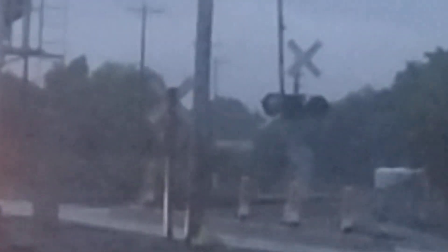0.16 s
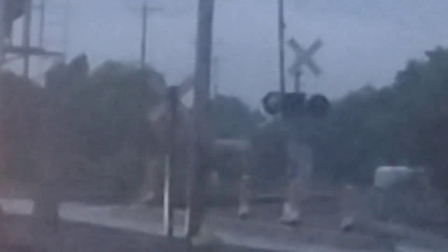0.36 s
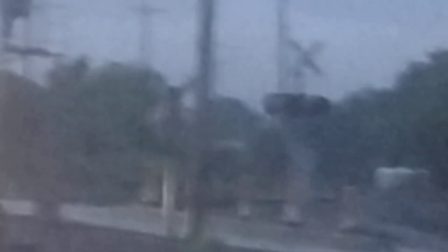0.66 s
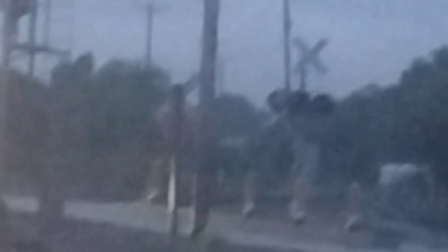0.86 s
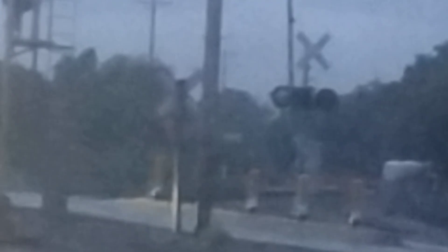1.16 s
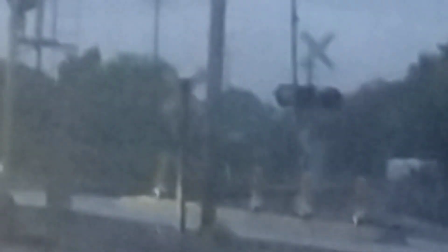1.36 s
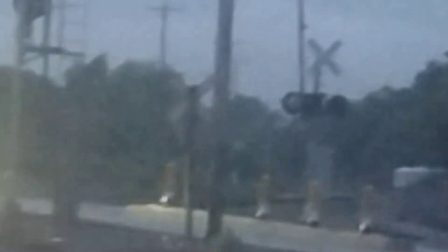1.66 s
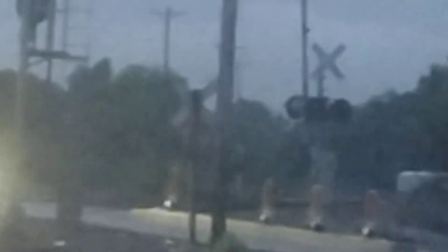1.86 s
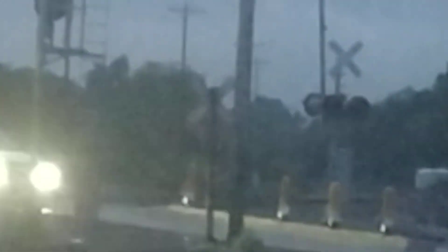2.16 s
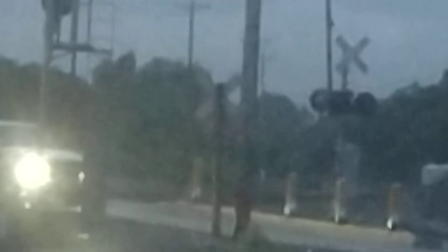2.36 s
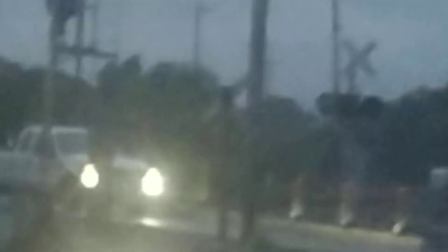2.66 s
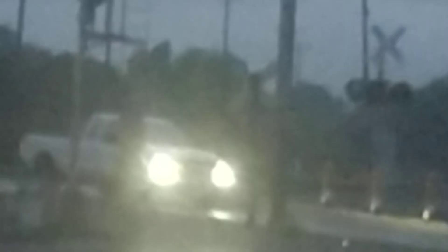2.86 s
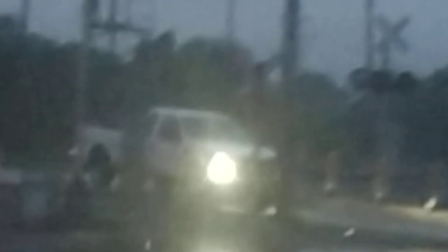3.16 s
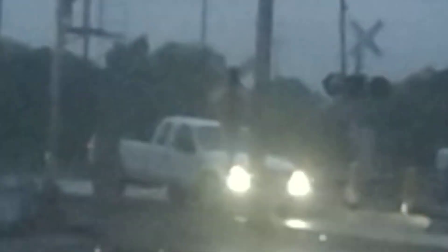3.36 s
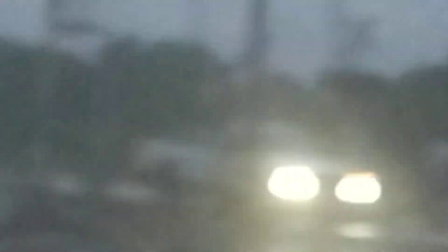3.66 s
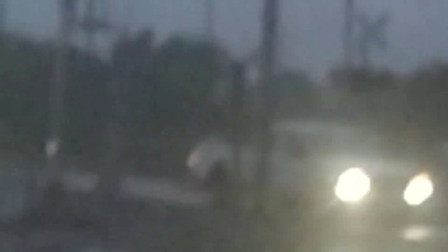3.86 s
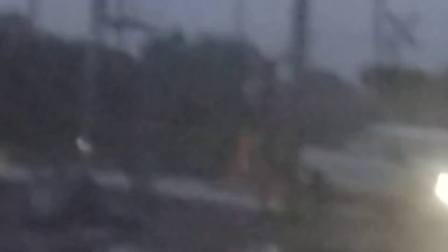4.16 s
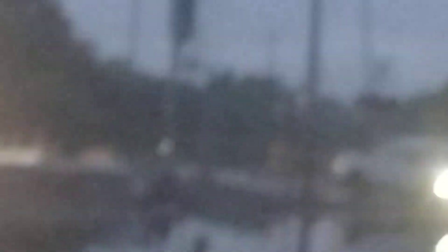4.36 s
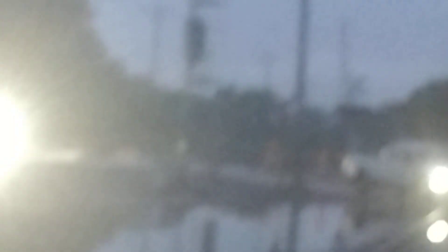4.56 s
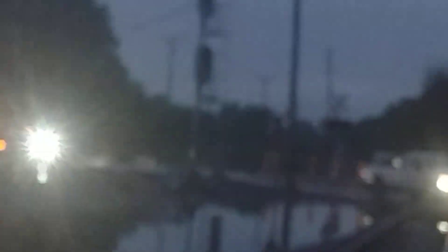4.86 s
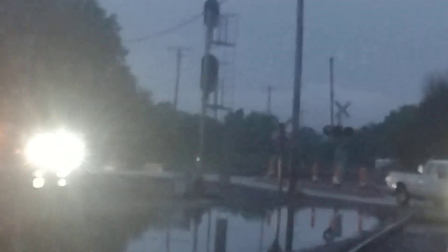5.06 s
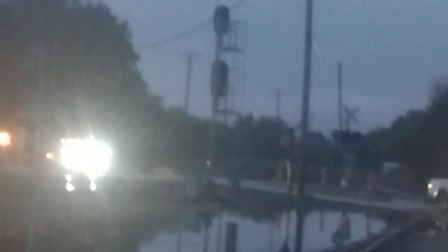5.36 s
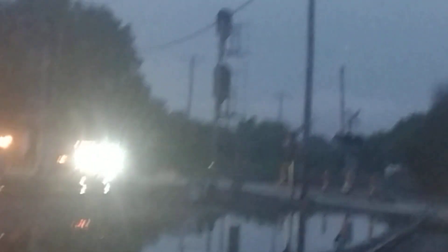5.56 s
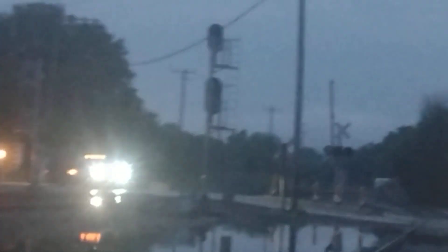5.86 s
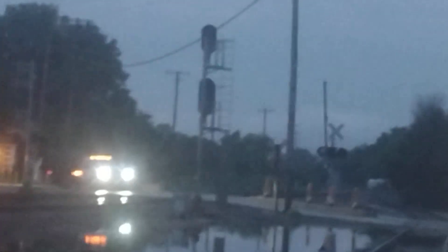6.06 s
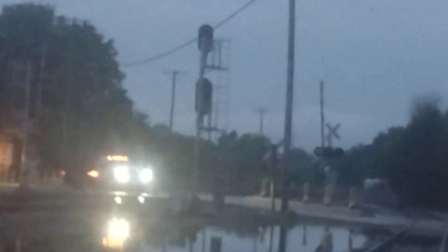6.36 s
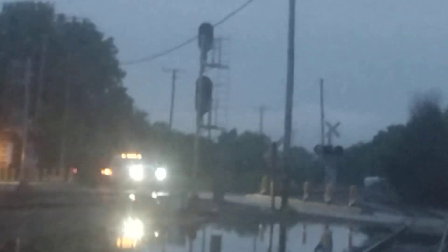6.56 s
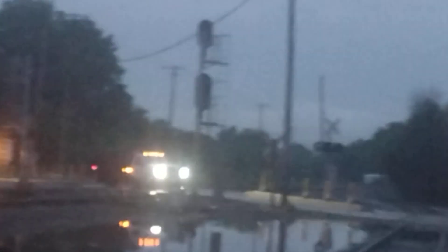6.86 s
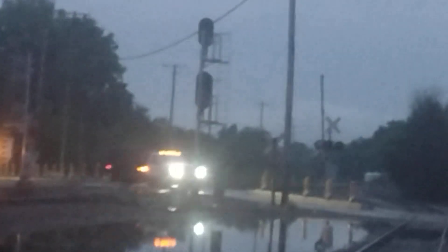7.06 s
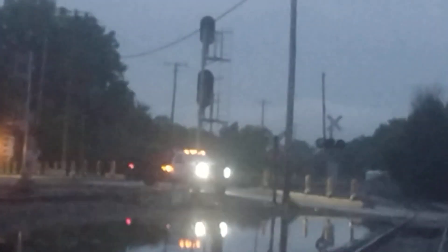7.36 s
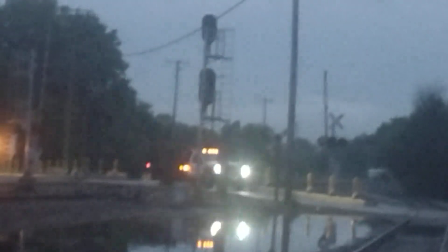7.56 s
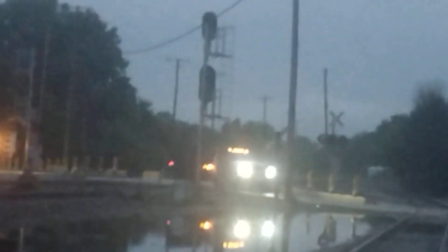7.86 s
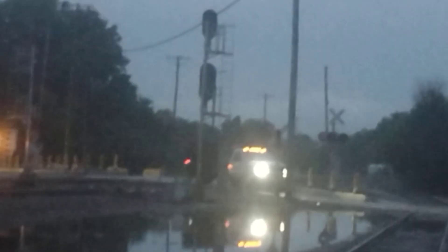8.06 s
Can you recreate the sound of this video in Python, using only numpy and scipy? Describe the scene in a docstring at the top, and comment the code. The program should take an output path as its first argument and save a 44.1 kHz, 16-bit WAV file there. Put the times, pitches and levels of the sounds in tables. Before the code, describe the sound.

Outdoors beside a wet rail crossing, a car's tyre hiss recedes while wind bumps the microphone. A pickup sweeps past close by, with bright sizzling spray and a soft engine hum, then knocks twice over the rails. A truck follows, its throbbing V8 growing over splashing tyres. Distant traffic rumbles beneath. Handheld stereo microphone near the road.

```python
"""A wet level crossing at dusk: a car hisses away, a pickup drives past, a truck with a throbbing V8 pulls up the road.
Tyres are noise filtered in short frames: roar, tread, sizzle of water in the tread and fine spray, each with its swell.
Engines are sums of harmonics of a gliding rate. Enveloped noise gives the puddles, the knocks of tyres over the rails,
the traffic rumble, the faint far wash, and the puff of wind that buffets the two microphone ports."""
import sys
import numpy as np
from scipy import signal
from scipy.fft import rfft, irfft
from scipy.io import wavfile
from scipy.ndimage import uniform_filter1d

SR = 44100
rng = np.random.default_rng(int(sys.argv[2]) if len(sys.argv) > 2 else 0)


def int16_out(signal):
    """Quantize to a 16-bit WAV file."""
    q = np.round(np.clip(np.atleast_2d(signal).T, -1, 1) * 32767)
    wavfile.write(sys.argv[1], SR, q.astype(np.int16))


N = 362432
TIME = np.arange(N) / SR


def gain_of(db):
    """Level definition: decibels to amplitude ratio."""
    return 10 ** (np.asarray(db) / 20)


def evened(x):
    """Normalisation: scales a signal to rms 1."""
    return x / np.sqrt(np.mean(x ** 2) + 1e-20)


def read(points, hz, axis=1):
    """Spectral interpolation: one column of a table, joined along a log-frequency axis."""
    table = np.transpose(points)
    return np.interp(np.log(hz + 1), np.log(table[0] + 1), table[axis])


def curves(rows, t=TIME):
    """Linear interpolation: the columns of a time table at the times t."""
    s, *columns = np.transpose(rows)
    return [np.interp(t, s, column) for column in columns]


def fade_in(t, s, length):
    """Raised-sine transition: rises from 0 to 1 over the length, centred on s."""
    return .5 + .5 * np.sin(np.pi * np.clip((t - s) / length, -.5, .5))


def drift(rate_hz):
    """Low-pass noise: a slow random wander."""
    t = np.linspace(0, N / SR, 2048)
    hz = np.fft.rfftfreq(len(t), t[1])
    spectrum = rfft(rng.standard_normal(len(t))) * np.exp(-(hz / rate_hz) ** 2)
    return np.interp(TIME, t, evened(irfft(spectrum)))


def noise(colour):
    """Spectral shaping: white noise filtered to the given colour, steady, rms 1."""
    hz = np.fft.rfftfreq(N, 1 / SR)
    spectrum = rfft(rng.standard_normal(N)) * gain_of(read(colour, hz))
    return evened(irfft(spectrum, N))


def at_ports(x, lag_ms, side_db):
    """Interaural-type cues: a lag at the left port; left is raised and right lowered by side_db."""
    left = np.interp(TIME - lag_ms / 1000, TIME, x)
    return np.array([gain_of(side_db) * left, x / gain_of(side_db)])


def passing(t, row, falloff):
    """Geometric spreading: level in dB drawing near, peaking and receding into a lingering hiss."""
    s, db, rise, fall = row
    away = (t - s) / np.where(t < s, rise, fall)
    linger = (t > s) * gain_of(-16.5) ** 2  # mist hangs behind the vehicle, dB re the peak
    return db + 10 * np.log10((1 + away ** 2) ** -falloff + linger)


# exponents of decay with distance for roar, tread, sizzle, spray (1 = inverse square)
DISTANCE_FALLOFF = [.6, 1.05, 2.5, 3]
# narrow peaks and notches of the microphone ports: f/Hz, width/Hz, level/dB
PORT_RESONANCES = [(680, 43, -7), (1048, 42, 3.5), (1310, 72, 4.5), (2330, 44, 2), (2590, 140, -3),
                   (2930, 92, 0), (3300, 56, 1.5), (3700, 130, -1.5), (4030, 103, 4.5), (4380, 170, 2.5),
                   (5600, 200, -3.5), (6460, 240, 0.5), (7090, 104, -14.5), (7230, 150, 3), (8250, 180, 1),
                   (9570, 610, -3), (13900, 600, -1)]


def tyres(colour, swell, same, lag_ms, start=None, end=None, patchy_db=1., flicker_db=.5, glide=0):
    """Short-time spectral synthesis: roar, tread, sizzle and spray swell apart; thrown water comes in uneven sheets."""
    hz = np.fft.rfftfreq(512, 1 / SR)
    t = np.arange(N // 128 + 2) * 128 / SR  # frame times
    a, b, c, d, patches = rng.standard_normal((5, len(t), len(hz)), dtype=np.float32)

    # each layer rules its own band, crossing to the next over the edges in Hz
    layers = np.zeros(4)
    if swell:
        layers = [passing(t[:, None], row, falloff) for row, falloff in zip(swell, DISTANCE_FALLOFF)]
    roar, tread, sizzle, spray = layers
    edges_hz = [(1100, 1500), (2000, 3000), (4100, 5800)]
    to_tread, to_sizzle, to_spray = (np.interp(hz, edges, [0, 1]) for edges in edges_hz)
    db = roar + (tread - roar) * to_tread
    db = db + (sizzle - tread) * to_sizzle + (spray - sizzle) * to_spray

    # the road's reflection colours the sound; its bands slide upward (glide, per s) as the angle flattens
    stretch = np.exp(glide * np.clip(t - swell[-1][0], -1, 1))[:, None] if glide else 1
    db = db + read(colour, hz / stretch)
    db = db + sum(peak * np.exp(-((hz - f) / width) ** 2) for f, width, peak in PORT_RESONANCES)

    # patches vary over time and frequency, flicker over time alone
    patches = uniform_filter1d(uniform_filter1d(patches, size=22, axis=0), size=5, axis=1)
    flicker = evened(uniform_filter1d(rng.standard_normal(len(t)), size=9))[:, None]
    db = db + patchy_db * evened(patches) + flicker_db * flicker

    # below 300 Hz the engines and the rumble take over
    size = gain_of(db) * (hz / 300) ** 3 / np.sqrt(1 + (hz / 300) ** 6)
    share = fade_in(t, *start) if start else np.ones(len(t))  # of power
    if end:
        share = share * (1 - fade_in(t, *end))

    # the sound reaches the left port a little later; the low roar comes more from straight ahead
    alike = np.clip(read(same, hz), 0, 1)
    late_ms = lag_ms * read([(750, 0.58), (1150, 0.96)], hz)
    right = a + 1j * b
    left = alike * right + np.sqrt(1 - alike ** 2) * (c + 1j * d)
    left = left * np.exp(-2j * np.pi * hz * late_ms / 1000)
    side = gain_of(read(colour, hz, axis=2))
    ports = np.array([left * side, right]) / np.sqrt(1 + side ** 2)
    return ports * size * np.sqrt(share)[:, None]


# tyre colour at the reference swell: f/Hz, density level/dB, left minus right level/dB
CAR_COLOUR = [(348, -72.5, 3), (560, -82, -2.5), (910, -75, 1.5), (1210, -81, -5), (1598, -62.5, 2.5),
              (1860, -72.5, -2.5), (3220, -74.5, 2.5), (3710, -77, 40), (4450, -98, -7), (5700, -87.5, 7),
              (6870, -79, 1), (9500, -90, 8), (10650, -86.5, -3), (14700, -100.5, 0)]
# swell of roar, tread, sizzle, spray, one row each: peak t/s, level/dB re the colour, rise t/s, fall t/s
CAR_SWELL = [(0.68, 1, 0.3, 2.8), (0.68, 1.1, 0.24, 1.05), (0.92, 3, .38, 2.17), (1.024, 6, 0.28, 0.54)]
# likeness of the two ports for a source close by (also pickup and truck): f/Hz, coherence 0-1
NEAR_SAME = [(300, 1), (1000, 0.8), (2500, 0.6), (4000, 0.61), (8000, 0), (15000, 0.5)]


def car_tyres(end):
    """Receding source: the car's wet hiss peaks early and dies away."""
    return tyres(CAR_COLOUR, CAR_SWELL, NEAR_SAME, lag_ms=.25, end=end, patchy_db=1.07, flicker_db=0.75)


# colours driving past and then away: f/Hz, density level/dB, left minus right level/dB
PICKUP_COLOUR = [(367, -61, 1), (584, -70, 3.5), (1120, -68.5, -1), (1340, -75.5, 0), (2570, -61, 3),
                 (3280, -70, 2.5), (3944, -70.5, 4), (4500, -90, 7), (6100, -84, 2), (7600, -77.5, -1),
                 (9550, -82.5, -1), (10700, -82.5, 0), (12600, -93, 0), (14700, -89, -1)]
PICKUP_AWAY_COLOUR = [(357, -64.5, -0.5), (563, -69.5, 3), (830, -72.5, 3), (1060, -83, 0), (1590, -72, 1),
                      (2760, -78, -1), (3500, -88.5, 14.5), (4800, -101, 9), (6500, -100.5, 8),
                      (8230, -100, 9), (10200, -106.5, -1), (12600, -115, -1), (14800, -111, -8)]
# swell of roar, tread, sizzle, spray: peak t/s, level/dB re the colour, rise t/s, fall t/s
PICKUP_SWELL = [(3.4, -3.5, 0.32, 0.58), (3.45, 2.5, 0.35, 0.31), (3.36, 1.5, .48, 0.39),
                (3.437, 3.5, 0.38, 0.34)]
# likeness of the ports for a source down the road (also the truck): f/Hz, coherence 0-1
FAR_SAME = [(300, 1), (800, 0.52), (1800, 0.53), (2800, 0.14), (8000, 0.14), (15000, 0.17)]


def pickup_tyres(start, past, end):
    """Pass-by: a swelling near colour crossfades to an unswelled, less coherent one down the road."""
    near = tyres(PICKUP_COLOUR, PICKUP_SWELL, NEAR_SAME, lag_ms=0.487, start=start, end=past,
                 patchy_db=1.5, flicker_db=0.5)
    far = tyres(PICKUP_AWAY_COLOUR, None, FAR_SAME, lag_ms=0.53, start=past, end=end,
                patchy_db=0.0, flicker_db=-0.2)
    return near + far


# colours splashing and then rolling: f/Hz, density level/dB, left minus right level/dB
TRUCK_SPLASH_COLOUR = [(354, -55, -1), (505, -70, 1), (713, -55, -2), (1320, -73, 5.5), (1910, -63, 1.5),
                       (2480, -72, 2), (2930, -77, 2), (3970, -68, 16), (4670, -81.5, 4), (6200, -77, 9),
                       (8000, -73.5, 14), (11100, -86, 2), (12000, -96, 3), (14700, -99, 0)]
TRUCK_ROLL_COLOUR = [(300, -54.5, 4.5), (550, -75.5, -3), (870, -63, 0.5), (1300, -76, -5),
                     (1780, -59.5, 6.5), (2350, -70, -3.5), (3050, -73.5, 4.5), (3880, -83, 16),
                     (4780, -90.5, 9), (5600, -77, 3.5), (8300, -81.5, 7.5), (10900, -87, 2),
                     (12600, -100, 0), (15000, -103, 0)]
# swells of roar, tread, sizzle, spray: peak t/s, level/dB re the colour, rise t/s, fall t/s
TRUCK_SPLASH_SWELL = [(6.44, 0.31, 0.73, 1), (6.1, 0.6, 1, 0.97), (5.75, 0.77, 0.38, .6),
                      (5.57, 1.4, 0.38, 0.81)]
TRUCK_ROLL_SWELL = [(7.1, 3.8, 0.55, 0.48), (6.864, 1.7, 0.33, 1.22), (7.31, 5, 0.92, 7.2),
                    (7.29, 1.7, 1.8, 1.02)]


def truck_tyres(start, turned):
    """Changing source spectrum: a splashing colour with gliding bands gives way to a rolling one."""
    splash = tyres(TRUCK_SPLASH_COLOUR, TRUCK_SPLASH_SWELL, NEAR_SAME, lag_ms=0.506, start=start, end=turned,
                   patchy_db=0.5, flicker_db=1.0, glide=0.02)
    roll = tyres(TRUCK_ROLL_COLOUR, TRUCK_ROLL_SWELL, FAR_SAME, lag_ms=0.28, start=turned,
                 patchy_db=1.5, flicker_db=0.42)
    return splash + roll


# one stage gives way to the next: centre t/s, length t/s
HANDOVERS = [(2.68, 1), (3.98, 1), (5.08, 1), (6.25, 1)]


def wet_road():
    """Overlap-add: the frames of the three vehicles, one after another, become sound."""
    pickup_in, pickup_past, truck_in, truck_turned = HANDOVERS
    frames = car_tyres(pickup_in) + pickup_tyres(pickup_in, pickup_past, truck_in)
    frames = frames + truck_tyres(truck_in, truck_turned)
    hiss = signal.istft(frames, nperseg=512, noverlap=384, time_axis=1, freq_axis=2)[1]
    return hiss[:, :N] * np.sqrt(3 * SR / 512)


def order(turns, multiple, db, unsteady, phase):
    """Harmonic synthesis: one engine order, wavering in strength and phase."""
    angle = 2 * np.pi * multiple * turns + phase
    swing, slip = unsteady * drift(9), unsteady * drift(9)
    wave = (1 + swing) * np.cos(angle) + slip * np.sin(angle)
    return np.sqrt(2) * gain_of(db) * wave


# V8 cycle rate: t/s, f/Hz
TRUCK_SPEED = [(5.3, 13.5), (5.85, 14.16), (6.22, 15.73), (6.4, 15.89), (6.7, 15.96), (7, 16.29),
               (7.4, 16.55), (7.9, 16.76), (8.22, 17.17)]
# harmonics of the cycle: multiple, base level/dB before the truck turns, base level/dB after, unsteadiness 0-1
TRUCK_ORDERS = [(5, -61, -49, .2), (8, -33.5, -33, .1), (10, -48, -33.5, 0.05), (11, -44, -45, 0.05),
                (12, -51, -49, .28), (13, -51, -53, 0.2), (14, -48, -58, .28), (15, -43.5, -42.5, 1),
                (16, -31.5, -30, 0.2), (17, -56, -52, 0.7), (18, -32.5, -36, 0.22), (19, -31.5, -45, 0.22),
                (20, -40.5, -37, 0.66), (21, -42, -37, 0.25), (22, -39.5, -38.5, 0.49),
                (23, -53, -52, 0.46), (25, -54, -56, 0.4)]
# load, added to the multiples above the 12th: t/s, level/dB
TRUCK_LOAD = [(5.3, -21), (5.95, -11), (6.23, -1.7), (6.7, -3.5), (6.95, 1), (7.4, 0.5), (7.8, -3.5),
              (8.22, -0.5)]
# bass, added to the multiples up to the 12th: t/s, level/dB
TRUCK_BASS = [(5.3, -4), (5.85, -12.5), (6.22, -2.5), (6.8, -3), (7.2, -14), (7.6, -4), (8, 2), (8.22, 1.5)]
# the truck swings round and its exhaust note changes: centre t/s, length t/s
TRUCK_TURN = (7.21, 0.42)


def truck_engine():
    """Phase-aligned harmonics: they bunch once a cycle, like eight uneven firings, so the note throbs."""
    rate, = curves(TRUCK_SPEED)
    load_db, = curves(TRUCK_LOAD)
    bass_db, = curves(TRUCK_BASS)
    turns, turned = np.cumsum(rate) / SR, fade_in(TIME, *TRUCK_TURN)
    # the exhaust rings near the 18th multiple, which draws each bunch out into a short boom
    away = np.arange(32) - 18
    scatter = (.3 + .2 * abs(away)) * rng.standard_normal(32)
    ring = scatter - .6 * np.arctan(away / 2.5)  # phase in radians
    boom_hz, boom_width_hz, boom_peak_db = 263.3, 3.4, 5.5
    note = np.zeros(N)
    for multiple, before_db, after_db, unsteady in TRUCK_ORDERS:
        db = before_db + (after_db - before_db) * turned
        db = db + (bass_db if multiple <= 12 else load_db)
        # a narrow resonance booms as a harmonic climbs through it
        boom_db = boom_peak_db * np.exp(-((multiple * rate - boom_hz) / boom_width_hz) ** 2)
        note += order(turns, multiple, db + boom_db, unsteady, ring[multiple])
    return note * fade_in(TIME, 5.66, 0.38)


# V6 turning rate: t/s, f/Hz
PICKUP_SPEED = [(0, 33.2), (0.8, 33.2), (1.4, 32.36), (1.9, 33.2), (3, 34.5), (3.35, 34.65), (4.6, 36.15),
                (5.3, 37.6)]
# harmonics of the turning rate: multiple, base level/dB approaching, base level/dB driving off, unsteadiness 0-1
PICKUP_ORDERS = [(3, -44.5, -48, 0.09), (5, -52, -39.5, 0.1), (6, -49.5, -65, 0.22), (9, -64, -50.5, 0.5)]
# hum, added to every harmonic: t/s, level/dB
PICKUP_HUM = [(0, -5.5), (.8, -4), (1.4, 2), (2, -0.5), (2.8, 2), (3.58, -8), (3.85, 0.5), (4.65, -1),
              (5.1, -5)]
# the pickup goes by: centre t/s, length t/s
PICKUP_TURN = (3.09, 0.68)


def pickup_engine():
    """Harmonic series: a soft six-cylinder hum dips, then gains speed, and changes colour as it goes by."""
    rate, = curves(PICKUP_SPEED)
    hum_db, = curves(PICKUP_HUM)
    turns, gone = np.cumsum(rate) / SR, fade_in(TIME, *PICKUP_TURN)
    hum = np.zeros(N)
    for multiple, front_db, rear_db, unsteady in PICKUP_ORDERS:
        db = hum_db + front_db + (rear_db - front_db) * gone
        hum += order(turns, multiple, db, unsteady, 2 * np.pi * rng.random())
    return hum * (1 - fade_in(TIME, 5.1, .7))


# tyres cut through puddles: centre t/s, length t/s, level/dB
PUDDLES = [(3.043, 0.044, -49), (3.606, .06, -39.5), (6.59, 0.064, -48), (7.176, 0.05, -42)]
# relative colour of the splash: f/Hz, level/dB
PUDDLE_COLOUR = [(1500, -30), (3000, -9), (4100, 12), (4900, 2.5), (5800, 7), (8000, 9), (11000, -1),
                 (15000, -22)]


def puddles():
    """Gated broadband noise: brief sheets of thrown water, independent at the ports."""
    power = sum(gain_of(db) ** 2 * np.exp(-((TIME - s) / length) ** 2) for s, length, db in PUDDLES)
    return np.sqrt(power) * np.array([noise(PUDDLE_COLOUR), noise(PUDDLE_COLOUR)])


# tyres knocking on the rails: onset t/s, level/dB before the attack and decay
KNOCKS = [(4.72, -32), (4.801, -32.5)]
# relative colour of a knock: f/Hz, level/dB
KNOCK_COLOUR = [(60, -28.5), (200, -10), (450, 1), (800, 6), (1300, -8), (1900, -3), (3500, -22),
                (8000, -52)]


def rail_knocks():
    """Impact excitation: short dull slaps with exponential attack and decay as tyres cross the rails."""
    rise, decay = .006, 0.03  # time constants in s
    blows = np.zeros(N)
    for s, db in KNOCKS:
        age = np.maximum(TIME - s, 0)
        blows += gain_of(db) * (1 - np.exp(-age / rise)) * np.exp(-age / decay)
    return blows * noise(KNOCK_COLOUR)


# wind buffets, the first a long gust under the others: centre t/s, length t/s, left level/dB, right level/dB
BUFFETS = [(1.104, 0.29, -44, -32), (1.109, 0.026, -38, -24.5), (1.395, 0.056, -51, -27.5),
           (1.837, 0.11, -40, -34.5)]
# relative colour of the wind: f/Hz, level/dB
WIND_COLOUR = [(15, -34), (40, -17), (75, 1), (120, 4.5), (200, -6.5), (320, -15), (600, -42), (2000, -80)]


def wind():
    """Turbulent pressure: eddies hit each port separately, over a faint steady breeze."""
    power = gain_of(-59.0) ** 2  # breeze
    for s, length, left_db, right_db in BUFFETS:
        power = power + gain_of([[left_db], [right_db]]) ** 2 * np.exp(-((TIME - s) / length) ** 2)
    return np.sqrt(power) * np.array([noise(WIND_COLOUR), noise(WIND_COLOUR)])


# relative colour of the low traffic rumble: f/Hz, level/dB
RUMBLE_COLOUR = [(15, -96), (30, -96), (45, -83), (65, -69.5), (85, -64.5), (140, -59), (210, -65),
                 (310, -66), (400, -74), (520, -103), (900, -130)]
# its swell: t/s, relative level/dB
RUMBLE_SWELL = [(0, -5), (.5, -2), (1, -1), (2, 0), (2.6, 1.5), (3.3, -1), (4.3, 2.5), (5, 3.5), (5.7, 6.5),
                (6.1, 6), (7, -3), (8.22, 6)]


def rumble(level_db=-43.0, apart_db=-27.0):
    """Low-frequency coherence: noise of exhausts and rolling tyres, nearly the same at both ports."""
    swell_db, = curves(RUMBLE_SWELL)
    common = noise(RUMBLE_COLOUR)
    side = gain_of(apart_db) * noise(RUMBLE_COLOUR)
    return gain_of(level_db + swell_db) * np.array([common + side, common - side])


# relative colour of far traffic on wet streets: f/Hz, level/dB
WASH_COLOUR = [(20, -19), (40, 2), (90, 3.5), (300, -12), (750, -0.5), (1150, -21), (1500, -4), (2200, -34),
               (5000, -17.5), (8000, -27), (12000, -40), (15000, -42)]


def wash(level_db=-52.5):
    """Diffuse field: steady distant traffic from all around, independent at the ports."""
    return gain_of(level_db) * np.array([noise(WASH_COLOUR), noise(WASH_COLOUR)])


def scene():
    """Superposition: tyres, water, engines, knocks, wind and distant traffic add."""
    engines = at_ports(truck_engine(), lag_ms=0.17, side_db=-0.1)
    engines = engines + at_ports(pickup_engine(), lag_ms=0.2, side_db=-0.2)
    knocks = at_ports(rail_knocks(), lag_ms=0.2, side_db=-1.0)
    return wet_road() + engines + puddles() + knocks + wind() + rumble() + wash()


def record(dry):
    """Band limitation: a linear-phase low-pass at 15750 Hz."""
    low_pass = signal.firwin(511, 15750, window=("kaiser", 9), fs=SR)
    return signal.oaconvolve(dry, low_pass[None], "same")


dry = scene()
out = record(dry)
int16_out(out)
```